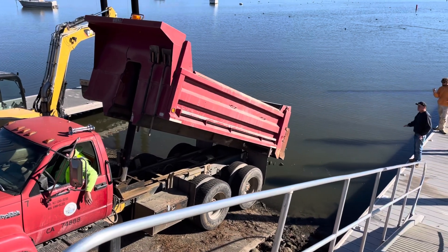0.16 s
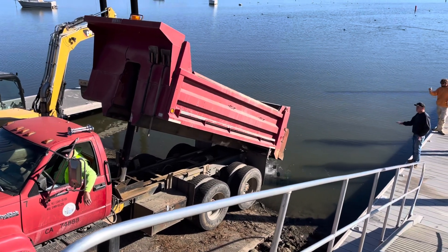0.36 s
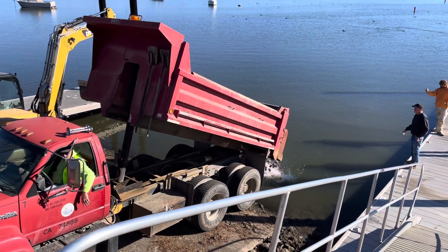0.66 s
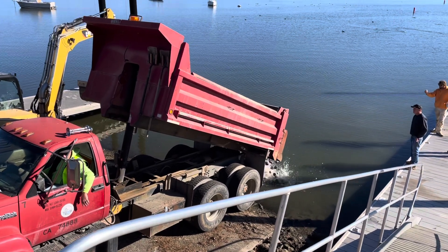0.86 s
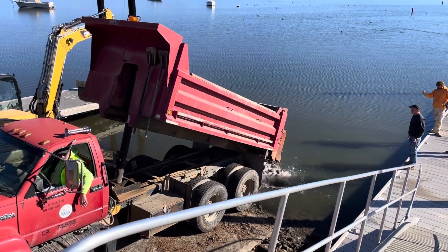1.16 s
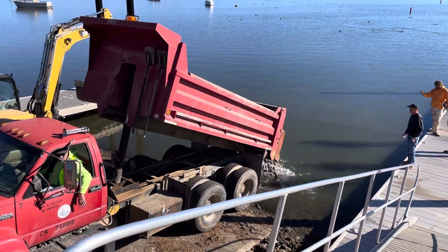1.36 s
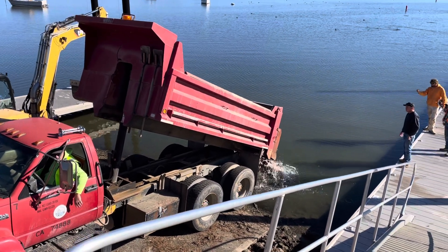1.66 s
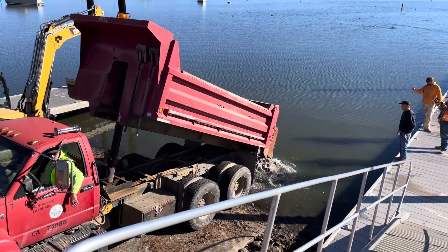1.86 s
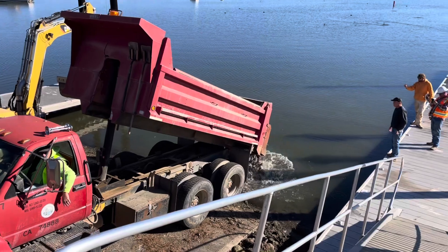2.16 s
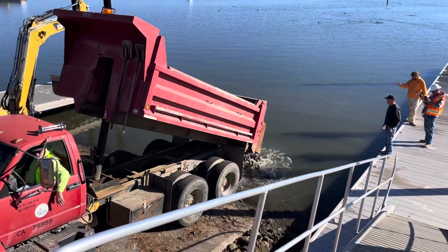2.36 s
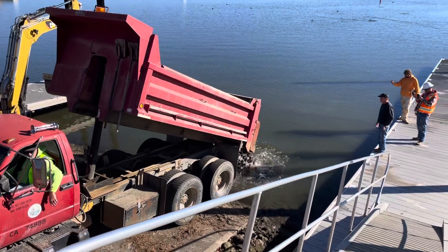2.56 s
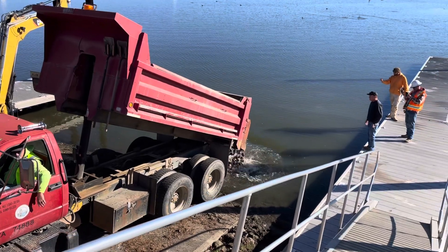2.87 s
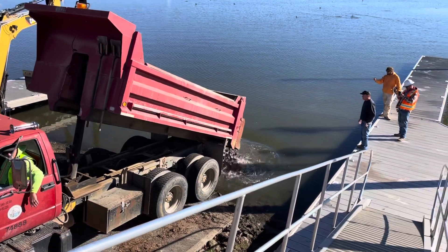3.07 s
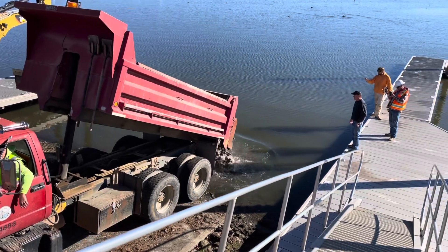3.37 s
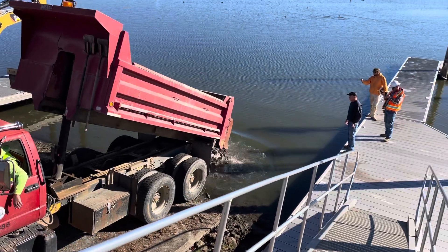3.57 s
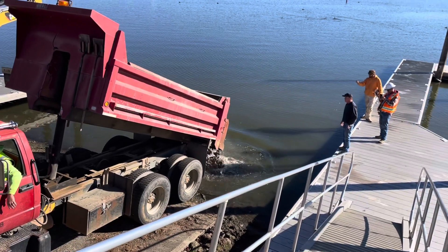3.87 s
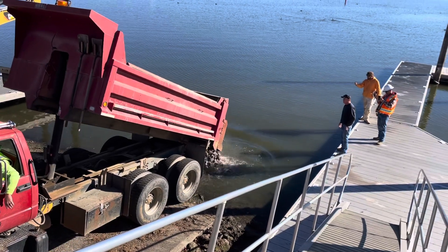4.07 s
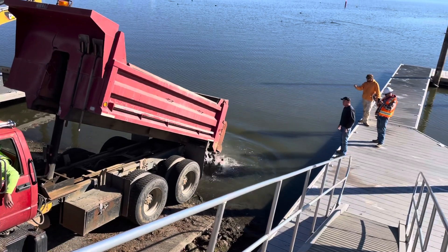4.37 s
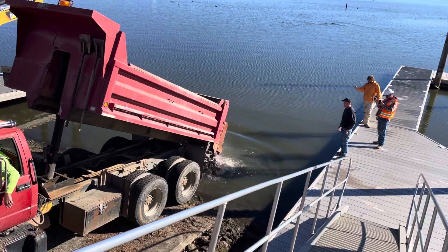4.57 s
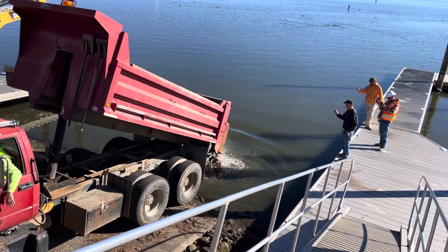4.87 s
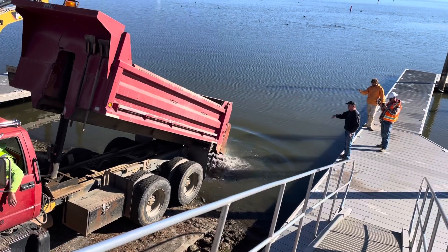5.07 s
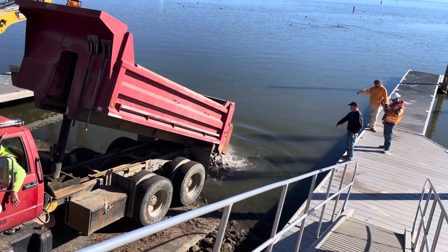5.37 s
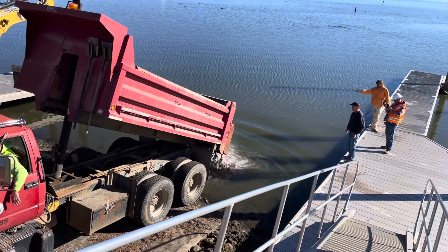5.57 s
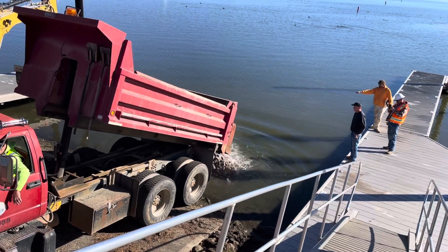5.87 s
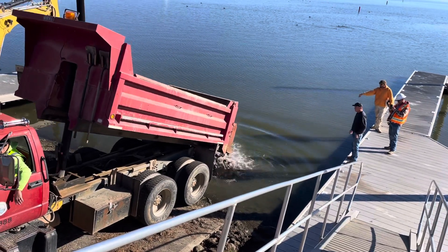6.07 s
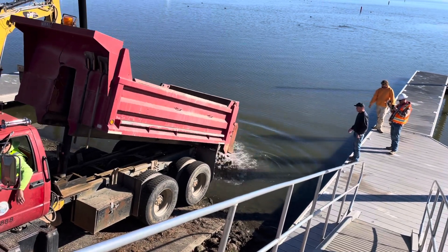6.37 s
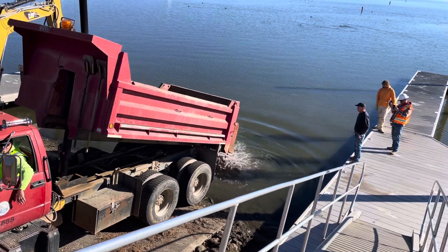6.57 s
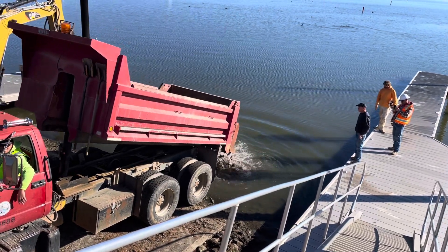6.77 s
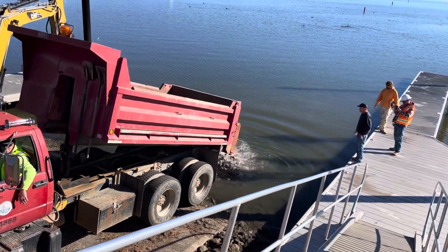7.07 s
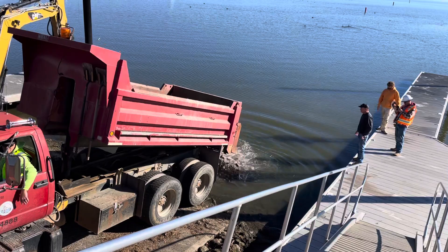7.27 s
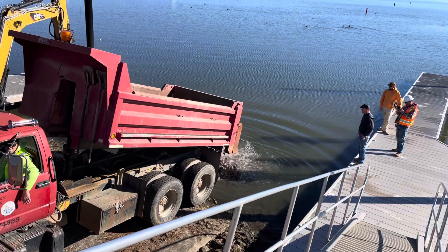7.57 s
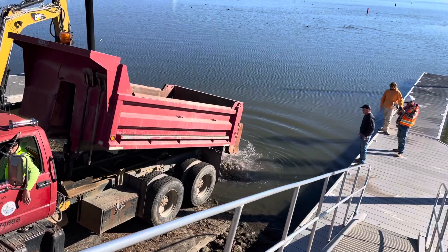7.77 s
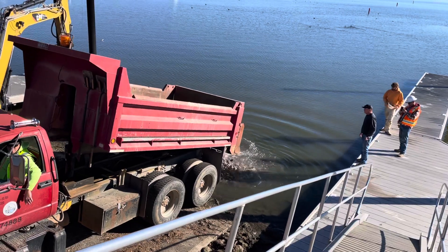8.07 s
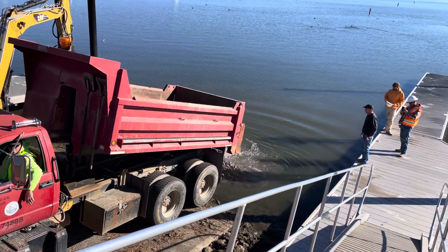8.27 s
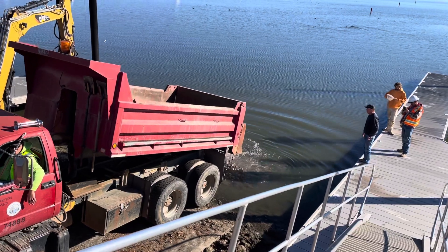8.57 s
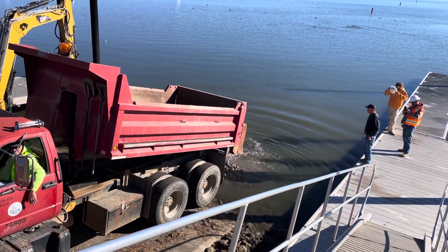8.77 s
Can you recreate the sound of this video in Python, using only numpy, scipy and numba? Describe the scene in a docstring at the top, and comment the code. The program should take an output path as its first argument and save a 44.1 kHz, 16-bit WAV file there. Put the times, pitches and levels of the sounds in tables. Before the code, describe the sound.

Outdoors beside a lake, a phone on a jetty hears rock pouring from a raised steel truck bed some metres away. At 0 s the load breaks loose with a loud low shudder and boom, and hard knocks crowd the first 0.3 s. More heavy clacks strike near 0.55 and 0.8-0.9 s. From 1 to 6 s a dense, steady, rough roar of tumbling stone continues, mid-heavy, with bright clacks, hollow bed drumming, wavering tailgate ring and hissing splash; bigger knocks stand out around 1.6, 2.3, 2.75, 3.8, 4.5 and 5.9 s. Near 6.6-6.8 s very faint, thin, high brake squeaks are almost buried. From 6.8 s the flow weakens and the splash fades; individual clicks and thuds separate. After 8 s only lumpy trickles and sharp single knocks remain, including ones near 8.15 and 8.72 s, over a quiet, throbbing engine idle with slight hiss.

```python
"""Rock poured into a lake

A raised steel truck bed pours broken rock into a lake, some metres from a phone on the jetty.
Stones clack, drum the bed and splash: filtered showers of random impacts and short ringing sines.
The flow thins to single knocks, built from cracks, sines and noise, over the idling truck's coloured noise.
Two microphone ports hear the load with a colour and lag of their own."""
import sys
import numpy as np
from scipy import signal
from scipy.fft import rfft, irfft, next_fast_len
from scipy.io import wavfile
from scipy.ndimage import uniform_filter1d
from numba import njit

SR = 44100
rng = np.random.default_rng(int(sys.argv[2]) if len(sys.argv) > 2 else 0)


def log_audio(samples):
    """Write samples as a 16-bit WAV file to the path given in sys.argv[1]."""
    # one column per channel
    frames = np.atleast_2d(samples).T
    # limit to full scale, then quantise
    limited = np.clip(frames, -1, 1)
    pcm = np.round(limited * 32767).astype(np.int16)
    wavfile.write(sys.argv[1], SR, pcm)


N = 394075

# Strength of the stream. Each row: time in seconds, base level in dB.
FLOW = [(0, -13.5), (0.1, -20), (0.35, -20), (0.62, -18.5), (0.8, -18), (0.95, -20), (1.1, -22),
        (1.17, -21.5), (1.35, -21.5), (1.55, -21.5), (1.7, -20.5), (1.94, -22), (2.28, -23), (2.35, -20.5),
        (2.46, -25.5), (2.53, -22), (3.03, -22), (3.16, -23.5), (3.25, -22), (3.7, -23), (4.25, -23.5),
        (4.47, -22), (4.55, -21.5), (4.78, -23), (5.1, -21.5), (5.35, -23), (5.67, -23.5), (5.95, -21),
        (6.05, -24), (6.24, -23), (6.32, -25), (6.5, -22), (6.65, -23), (6.85, -27.5), (7.04, -27),
        (7.15, -28.5), (7.29, -30.5), (7.34, -27.5), (7.4, -32), (7.52, -29.5), (7.6, -28.5), (7.72, -28),
        (7.79, -32), (7.88, -33.5), (7.99, -39), (8.02, -36), (8.11, -36.5), (8.22, -38), (8.3, -32),
        (8.36, -39), (8.44, -32), (8.57, -45), (8.64, -48), (8.69, -35), (8.8, -46), (8.94, -46)]
# Single stones. Each row: start in seconds, strength in dB, pitch in Hz, thud over strength in dB.
KNOCKS = [(0.0445, -17, 1890, -3), (0.159, -16, 1270, 12.5), (0.178, -14, 1300, 7), (0.2006, -9, 2120, 4),
          (0.215, -13, 1500, 6), (0.345, -17, 1600, 12), (0.4517, -20, 1340, -15), (0.564, -12, 1400, 5),
          (0.788, -15, 1400, 4), (0.7918, -14, 2630, -1), (0.806, -10, 2600, 1), (0.818, -15, 1990, 1),
          (0.8634, -14, 2750, -5), (0.886, -15, 2610, -1), (1.142, -15, 1200, -3), (1.173, -21, 1310, -1),
          (1.585, -12, 1280, 2), (1.758, -28, 1270, 0), (2.2548, -14, 1500, 3.5), (2.3256, -14, 2470, 4),
          (2.515, -17, 2570, -2), (2.703, -28, 2320, -7), (2.7451, -14, 1880, 1), (2.974, -15, 1420, -9),
          (3.6267, -19, 1300, -11), (3.787, -15, 1570, 2), (4.0251, -15.5, 1310, 5),
          (4.5262, -16, 1305, 8.5), (4.9108, -18, 1430, -4), (5.448, -20, 1370, -5), (5.924, -13, 2490, -6),
          (6.0432, -18, 1350, -8), (6.2206, -19, 2590, 4), (6.7998, -33, 1380, -3), (6.881, -24, 2600, -3),
          (6.94, -24, 1610, -6), (7.0147, -21, 1367, 5), (7.029, -21, 1920, 1), (7.079, -28, 1500, -5),
          (7.134, -23, 2500, -8), (7.205, -21, 1900, 5), (7.291, -27, 1960, -5), (7.35, -21.5, 2310, -2),
          (7.419, -21, 3170, -14), (7.454, -21, 2500, -12), (7.52, -21, 3180, -7), (7.539, -23, 1250, 0),
          (7.595, -28, 3000, -12), (7.6216, -19.5, 2000, 1), (7.699, -32, 1500, 7),
          (7.7806, -39, 1687, -10), (7.807, -25, 2230, 5), (7.891, -27, 3100, 0), (7.93, -24.5, 2500, 3),
          (7.956, -21.5, 2780, -12), (7.9987, -25, 2170, 4), (8.018, -24, 2400, 4),
          (8.042, -26.5, 2080, -13), (8.055, -23.5, 2320, -3), (8.1357, -24, 2920, -6),
          (8.14, -16, 2030, -12), (8.1477, -25, 3130, 7.5), (8.165, -26, 2860, 6.5),
          (8.1795, -14, 2520, -20), (8.1914, -35, 2080, -9), (8.237, -36, 2200, 2), (8.2673, -30, 1920, -2),
          (8.2844, -28, 2030, 4), (8.323, -39, 2500, -8), (8.3448, -24, 2480, -18),
          (8.399, -23.5, 1500, 7.5), (8.409, -26, 1500, 6), (8.418, -30, 1800, 10), (8.4334, -41, 1190, 9),
          (8.469, -32, 3300, -10), (8.483, -28, 2890, -8), (8.5075, -24.5, 2640, -6),
          (8.5835, -38, 2900, -10), (8.6225, -26, 2420, -6), (8.6663, -27, 2650, 8), (8.678, -28, 1300, 4),
          (8.692, -30, 1200, 4), (8.72, -17, 2820, -8), (8.7272, -19, 2600, -15), (8.7514, -41, 2880, 8)]
# Resonances of the steel bed. Each row: pitch in Hz, width in Hz, gain in dB.
BED_MODES = [(70.6, 15, -13), (118, 51, -12.5), (172.4, 20.5, -3.5), (202.7, 17, 0.5), (229.7, 19.7, 1.5),
             (250.7, 23.3, 1), (283.4, 75, -4.5), (363, 44, -6.5)]
# Resonances of the tailgate plates at rest. Each row: pitch in Hz, width in Hz, gain in dB.
GATE_MODES = [(786, 60, -8), (1300, 125, 11.5), (1450, 250, 2), (2700, 410, -9)]
# Colour of tumbling stones and thuds. Each row: frequency in Hz, gain in dB.
CLATTER_COLOUR = [(150, -23.5), (300, 1), (450, 1), (560, 0.5), (750, -1), (1100, -1.5), (1600, -4),
                  (2200, -15), (4000, -44)]
# Colour of the bright clacks and chips. Each row: frequency in Hz, gain in dB.
CLACK_COLOUR = [(800, -15), (1500, 1), (2200, 0), (3000, -5), (4000, -10), (5000, -12), (6000, -20),
                (8000, -23.5), (12000, -82.5)]
# Colour of the splashing. Each row: frequency in Hz, gain in dB.
SPRAY_COLOUR = [(4500, -9), (7000, 0), (10000, -6), (13000, -14), (15500, -22)]
# Brake squeaks. Each row: centre in seconds, half length in seconds, level in dB.
SQUEAKS = [(6.62, 0.03, -55), (6.69, 0.02, -52), (6.81, 0.02, -53)]
# The two microphone ports. Each row: frequency in Hz, left minus right in dB, share heard alike (0 to 1).
PORTS = [(25, 1, .9), (60, 0.5, .95), (200, 1.5, 1), (425, .5, 0.92), (690, -2, 0.91), (1310, -2, 0.86),
         (1720, -3, 0.67), (2830, 0, 0.84), (4710, 1, 0.62), (6500, 0.5, 0.7), (6760, 3, 1),
         (14800, 0.5, 1)]
# Echo off the jetty as the phone turns. Each row: time in seconds, first dip in Hz,
# echo strength (0 to 1), depth of the narrow dip (0 to 1).
ECHO = [(0, 523, 0.09, 0.64), (1.4, 503, 0.02, 0.8), (3, 331, 0.22, 0.25), (5.2, 330, 0.29, 0.45),
        (6.5, 325, 0.14, 0.03), (8.94, 348, 0.1, 0)]
# Lag between the ports. Each row: frequency in Hz, lead of the left port in radians.
LEFT_LEAD = [(30, 0), (430, -.2), (1380, 0), (3000, .7), (5000, .6), (6500, -.9), (7800, -3.0),
             (8700, -3.3), (10600, -6.0), (12800, -6.6), (14200, -9.2), (15700, -9.6)]
# The narrow dip that fades as the phone turns. Each row: pitch in Hz, width in Hz, gain in dB.
NARROW_DIP = [(580, 172, -1.5)]
# Colour of the idling engine. Each row: frequency in Hz, gain in dB.
IDLE_COLOUR = [(25, -15), (120, 10), (220, -2.5), (440, 5), (750, -2), (960, 2.5), (1400, -1), (1900, -28),
               (3100, -28), (4300, -25), (6000, -40), (8000, -20), (15000, -33)]
# Bright rattle, likely the tailgate hardware. Each row: pitch in Hz, width in Hz, gain in dB.
RATTLE_MODES = [(4500, 170, 12), (5300, 1300, -5.5)]
# Strength of the rattle. Each row: time in seconds, level over the stream's base level in dB.
RATTLE_LEVEL = [(0, -12.5), (1.8, -16), (2.6, -17.5), (6.5, -44), (8.94, -14)]
# What the stream strikes as the bed empties and sinks. Each row: time in seconds, then
# bed boom, tailgate ring and clack, each in dB over the stream's base level.
STRUCK = [(0, 2, -16, -6), (0.3, -4, -4, -0.5), (0.9, -2.5, -7.5, -3), (1.2, -3.5, -3, -1.5),
          (1.5, -3.5, -6.5, -2), (1.9, -3.5, -11.5, -2), (2.3, -4, -10, -0.5), (2.9, -3, -7.5, -1.5),
          (3.8, -3.5, -8.5, -1.5), (4.8, -3, -7.5, -2.5), (5.7, -4.5, -6, -0.5), (6.7, -1.5, -9, -1.5),
          (7.7, 1, -10, -3.5), (8.94, 4, -12.5, -3)]
# Strength of the splashing before a fixed lift of 10 dB. Each row: time in seconds, level in dB.
SPRAY_LEVEL = [(0, -51), (0.9, -53), (1.2, -54.5), (3.5, -51), (5.9, -52.5), (6.5, -55), (7.1, -64),
               (8.94, -69.5)]
# Main ring of the swinging tailgate as the load on it shifts. Each row: time in seconds, pitch in Hz.
GATE_PITCH = [(0, 1290), (1.7, 1280), (1.9, 1558), (2.4, 1541), (2.6, 1314), (3.6, 1290), (4.4, 1340),
              (5, 1376), (6.2, 1370), (8.94, 1370)]
# Colour of stone cracking on stone. Each row: frequency in Hz, gain in dB.
CRACK_COLOUR = [(500, -4), (1200, 8), (2500, 9), (4200, 4.5), (5400, 0), (6800, -14), (10000, -25)]

HZ = np.fft.rfftfreq(next_fast_len(N + SR // 4), 1 / SR)
TIME = np.arange(N) / SR
TAPS = 4096  # size used to design the colouring filters, in samples; each filter keeps the first half

# The stream.
LURCH_HZ, LURCH_DB, LURCH_T60_S = 55, -23, 0.64  # deep shudder of the bed as the load breaks loose
SURGE_PER_S, SURGE_DB = 22, 0.45  # quick swells: rate and depth in the full stream
SETTLE_S = 0.3  # level swings even out over this time
LUMPS_PER_DB = 0.15  # extra share of surge depth for each dB the stream weakens
CLACK_SURGE = 1.25  # the bright clacks swell this many times as far in dB
BIGGEST = 1.012  # nearer to 1 allows larger single impacts
WOBBLE_HZ = 22  # typical random swing of the tailgate's pitch

# The single stones.
ATTACK_S = 0.0023
CHIPS_T60_S, CHIPS_PER_THUD = 0.11, 0.27  # heavier stones scatter more chips (dB per dB of thud)
HEAVY_SOFT = 0.54  # heavy stones land with less crack (dB per dB of thud)
CRACK_T60_S, CRACK_RISE_S = 0.011, 0.0004

# The truck and the phone.
IDLE_DB, HISS_DB = -42, -53.5
HISS_HZ, HISS_WIDTH_HZ = 2800, 330  # hissy engine band; width of each of two passes
SQUEAK_HZ = 9100
TOP_HZ = 15700


def undb(db):
    """Gain of a level in dB."""
    return 10 ** (np.asarray(db) / 20)


def unit(x):
    """Scale to an average strength (rms) of 1."""
    return x / np.sqrt(np.mean(x ** 2))


def over_time(table):
    """Join a table's points with straight lines; one curve for each column after the time."""
    s, *columns = np.transpose(table)
    return [np.interp(TIME, s, column) for column in columns]


def on_hz(hz, value):
    """Straight lines on a log-frequency axis."""
    return np.interp(np.log(HZ + 1), np.log(hz), value)


def colour(x, points):
    """Shape the spectrum with a filter that never sounds ahead of its input (minimum phase)."""
    hz, db = np.transpose(points)
    filter_hz = np.fft.rfftfreq(TAPS, 1 / SR)
    gain = undb(np.interp(np.log(filter_hz + 1), np.log(hz), db))
    # Folding the cepstrum of the log gain moves all of the response after time zero.
    cepstrum = irfft(np.log(gain))
    cepstrum[1:TAPS // 2] *= 2
    cepstrum[TAPS // 2 + 1:] = 0
    response = irfft(np.exp(rfft(cepstrum)))[None, :TAPS // 2]
    return signal.oaconvolve(x, response)[:, :N]


def ring(x, modes):
    """Steel rings at several pitches at once: sum of resonances, alternating in sign."""
    total = 0
    for k, (hz, width_hz, db) in enumerate(modes):
        b, a = signal.iirpeak(hz, hz / width_hz, SR)
        total = total + (-1) ** k * undb(db) * signal.lfilter(b, a, x)
    return total


def walk(rate):
    """Random levels held 1 / rate seconds and smoothed, without slow drift; spread 1."""
    hold = int(SR / rate)
    x = np.repeat(rng.standard_normal(N // hold + 1), hold)
    x = uniform_filter1d(uniform_filter1d(x, hold), hold // 2)[:N]
    return unit(x - uniform_filter1d(x, int(SETTLE_S * SR)))


def blows(spread_db, smear_s, count):
    """Dense random impacts, few large and many small, with short noisy tails; rows: direct, scattered."""
    when, size = rng.random((count, 2)).T
    impact_power = undb(-2 * spread_db * np.log(BIGGEST - size))
    power = np.bincount((when * N).astype(int), impact_power, N)
    power = signal.lfilter([1], [1, -np.exp(-1 / (smear_s * SR))], power)
    return unit(np.sqrt(power) * rng.standard_normal((2, N)))


def lurch():
    """The bed shudders as the load breaks loose: a low band of noise that dies away."""
    shudder = unit(ring(rng.standard_normal((2, N)), [(LURCH_HZ, 50, 0)]))
    return shudder * undb(LURCH_DB - 60 * TIME / LURCH_T60_S)


@njit
def add(out, start, pole, size, length):
    """Each grain is a sine that dies away, made by turning and shrinking a complex number."""
    for k in range(len(start)):
        z = size[k] + 0j
        for i in range(start[k], min(start[k] + length[k], len(out))):
            z *= pole[k]
            out[i] += z.imag


def stones(low_hz, high_hz, t60, spread_db, count):
    """Every stone struck in the stream rings briefly at its own pitch; rows: direct, scattered."""
    when, pitch, size, lag = rng.random((count, 4)).T
    hz = low_hz * (high_hz / low_hz) ** pitch
    t60 = t60 * np.sqrt(low_hz / hz)  # small stones ring higher and shorter
    pole = np.exp((2j * np.pi * hz - np.log(1000) / t60) / SR)
    size = undb(-spread_db * np.log(1.03 - size)) * np.sqrt(hz / t60)  # keeps the sum flat per Hz
    length = (t60 * SR / 2).astype(np.int64)
    out = np.zeros((2, N))
    for row, late in zip(out, (0, lag * SR / 200)):  # scattered grains come up to 5 ms late
        add(row, (when * N + late).astype(np.int64), pole, size, length)
    return unit(out)


def swing(x):
    """The tailgate's ring slides up and down: all its pitches shift by the same number of Hz."""
    gate_hz, = over_time(GATE_PITCH)
    shift_hz = gate_hz - GATE_MODES[1][0] + WOBBLE_HZ * walk(10)
    turn = 2 * np.pi * np.cumsum(shift_hz) / SR
    return (signal.hilbert(x, next_fast_len(N))[:, :N] * np.exp(1j * turn)).real


def splash(surge):
    """Water spray: very many small impacts, coloured bright and swelling with the stream."""
    spray_db, = over_time(SPRAY_LEVEL)
    drops = unit(colour(blows(1.6, 0.0057, count=20000), SPRAY_COLOUR))
    return drops * undb(spray_db + 10.0 + surge + 1.3 * walk(17))


def pour():
    """Stones strike stone, bed and tailgate; clatter, clacks and spray share the same quick surges."""
    flow_db, = over_time(FLOW)
    boom_db, gate_db, clack_db = over_time(STRUCK)
    rattle_db, = over_time(RATTLE_LEVEL)
    lumps = 1 + LUMPS_PER_DB * np.clip(-24.5 - flow_db, 0, 12)  # surges deepen as the stream weakens
    surge = SURGE_DB * walk(SURGE_PER_S) * lumps

    tumble = blows(2.3, 0.018, count=9000)
    chips = blows(5.2, 0.015, count=7000)
    rings = stones(401.4, 6974.0, t60=0.15, spread_db=2.5, count=6000)

    boom = unit(ring(blows(0.9, 0.0039, count=6000), BED_MODES))
    boom = boom * undb(boom_db + 0.79 * walk(8))
    clatter = unit(colour(tumble + 0.43 * rings, CLATTER_COLOUR)) * undb(surge + 2.01)
    gate = unit(swing(ring(tumble + 0.77 * chips, GATE_MODES)))
    gate = gate * undb(gate_db + 1.2 * walk(12))
    clack = unit(colour(chips + 2.08 * tumble + 0.82 * rings, CLACK_COLOUR))
    clack = clack * undb(clack_db + CLACK_SURGE * surge)
    # Lone sharp ticks stand out more as the stream thins.
    ticks = unit(colour(blows(3.6, 0.0015, count=1200), CLACK_COLOUR))
    ticks = ticks * undb(clack_db - 10.0 + np.clip(-24 - flow_db, 0, 4))
    rattle = unit(ring(chips, RATTLE_MODES)) * undb(rattle_db)

    stream = boom + clatter + gate + clack + ticks + rattle
    return lurch() + undb(flow_db) * stream + splash(surge)


def knocks():
    """Each stone cracks, rings a few cycles, scatters chips and thuds on bed and tailgate."""
    t = np.arange(SR // 5) / SR
    fade = np.log(1000) * t  # divided by a T60, this gives a fall of 60 dB in that time
    rise = 1 - np.exp(-t / ATTACK_S)
    crack_shape = (1 - np.exp(-t / CRACK_RISE_S)) * np.exp(-fade / CRACK_T60_S)
    stone, crack, chips, thud = np.zeros((4, 2, N + SR))
    noises = rng.standard_normal((len(KNOCKS), 2, 2, len(t)))
    for (s, db, hz, thud_db), (chip_noise, thud_noise) in zip(KNOCKS, noises):
        now = slice(int(s * SR), int(s * SR) + len(t))
        sharp = undb(db - HEAVY_SOFT * max(thud_db, 0))
        chip_gain = undb(db + CHIPS_PER_THUD * thud_db)
        stone[:, now] += sharp * np.sin(2 * np.pi * hz * t) * np.exp(-fade / 0.022)
        crack[:, now] += sharp * np.sign(thud_noise) * crack_shape
        chips[:, now] += chip_gain * chip_noise * rise * np.exp(-fade / CHIPS_T60_S)
        thud[:, now] += undb(db + thud_db) * thud_noise * rise * np.exp(-fade / 0.092)
    thud_on_stone = 2.4 * colour(thud, CLATTER_COLOUR)
    thud_on_bed = 4.3 * ring(thud[:, :N], BED_MODES)
    thud_on_gate = 0.37 * ring(thud[:, :N], GATE_MODES)
    sharp_part = 0.63 * stone[:, :N] + colour(crack, CRACK_COLOUR) + 1.74 * colour(chips, CLACK_COLOUR)
    return sharp_part + thud_on_stone + thud_on_bed + thud_on_gate


def jetty(x):
    """A dull echo half a dip period late combs the mids; a narrow dip fades as the phone turns."""
    dip_hz, strength, depth = over_time(ECHO)
    dull = uniform_filter1d(x, size=11)
    echo = np.array([np.interp(TIME - 0.5 / dip_hz, TIME, row) for row in dull])
    x = x + np.clip(strength, 0, 1) * echo
    return x - np.clip(depth, 0, 1) * ring(x, NARROW_DIP)


def engine():
    """Idling engine: noise coloured as a gently throbbing rumble, plus a narrow hissy band."""
    noise = rng.standard_normal((2, N))
    idle = unit(colour(noise, IDLE_COLOUR)) * undb(IDLE_DB + 1.3 * walk(9))
    band = [(HISS_HZ, HISS_WIDTH_HZ, 0)]
    hiss = unit(ring(ring(noise, band), band)) * undb(HISS_DB + 1.6 * walk(15))
    return idle + hiss


def brakes():
    """Thin brake squeaks as the truck creeps: an unsteady sine let through in short swells."""
    pitch_hz = SQUEAK_HZ * (1 + 0.004 * walk(40))
    tone = np.sin(2 * np.pi * np.cumsum(pitch_hz) / SR)
    return tone * sum(undb(db) * np.exp(-((TIME - s) / half) ** 2) for s, half, db in SQUEAKS)


def scene():
    """The direct sound reaches both ports alike; what scatters off water and jetty differs between them."""
    load = jetty(pour() + knocks())
    direct, scattered = rfft(load + engine() + brakes(), 2 * (len(HZ) - 1))
    hz, pan_db, alike = np.transpose(PORTS)
    alike = np.clip(on_hz(hz, alike), 0, 1)
    sign = np.array([[1], [-1]])  # left, right
    lead = np.interp(HZ, *np.transpose(LEFT_LEAD))
    port = undb(sign * on_hz(hz, pan_db) / 2) * np.exp(1j * sign * lead / 2)
    same = np.sqrt((1 + alike) / 2) * direct
    different = sign * np.sqrt((1 - alike) / 2) * scattered
    return irfft(port * (same + different))[:, :N]


def record(dry):
    """The phone thins the deep bass, rounds the loudest peaks and cuts the top."""
    thin = signal.sosfilt(signal.butter(2, 55.0, "high", fs=SR, output="sos"), dry)
    rounded = 1.4 * np.tanh(thin / 1.4)
    return signal.sosfilt(signal.ellip(10, 0.2, 80, TOP_HZ, fs=SR, output="sos"), rounded)


dry = scene()
out = record(dry)
log_audio(out)
```